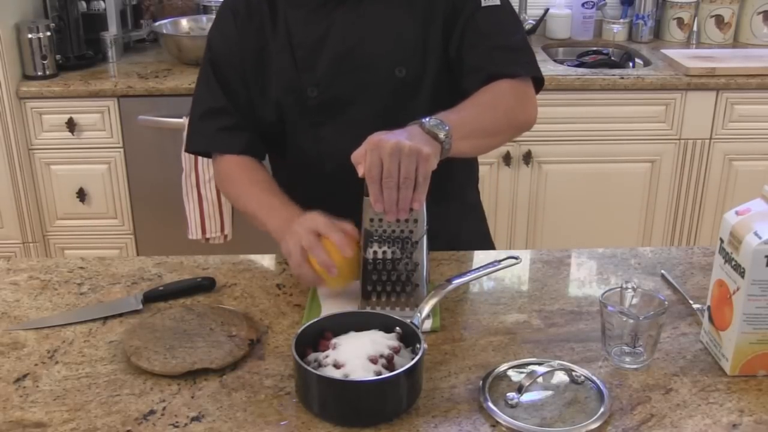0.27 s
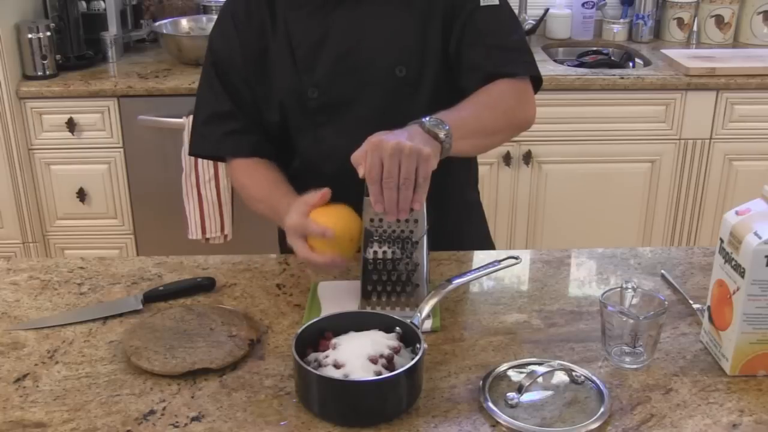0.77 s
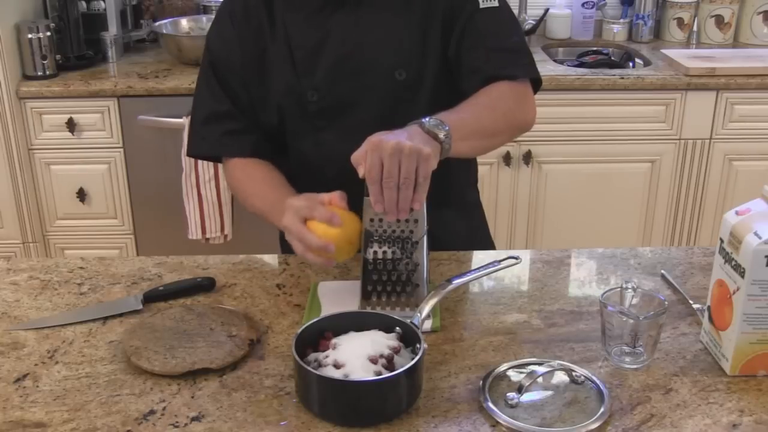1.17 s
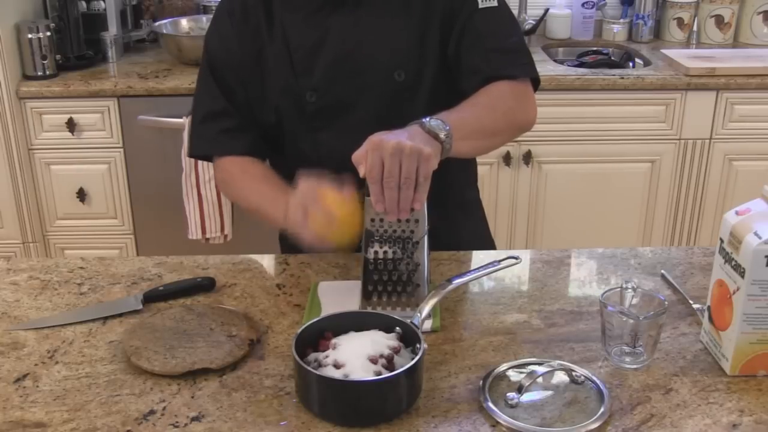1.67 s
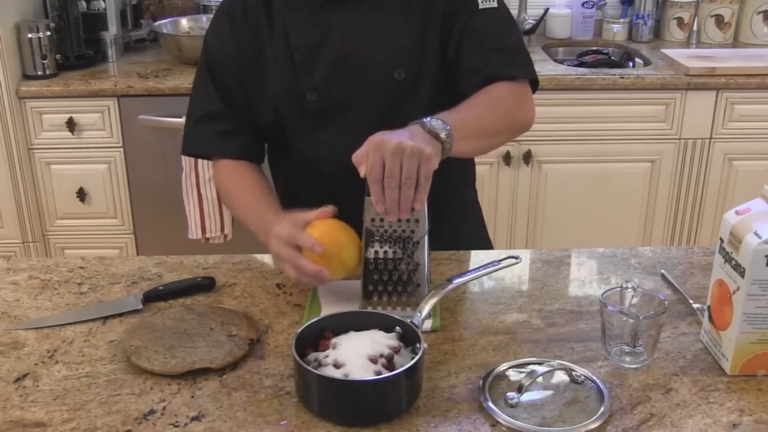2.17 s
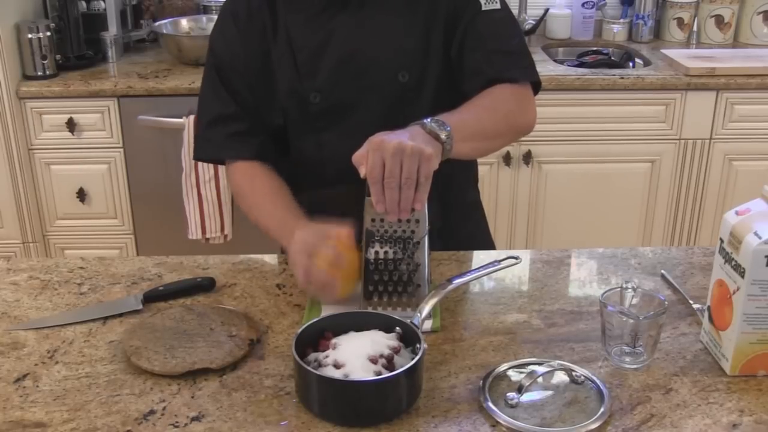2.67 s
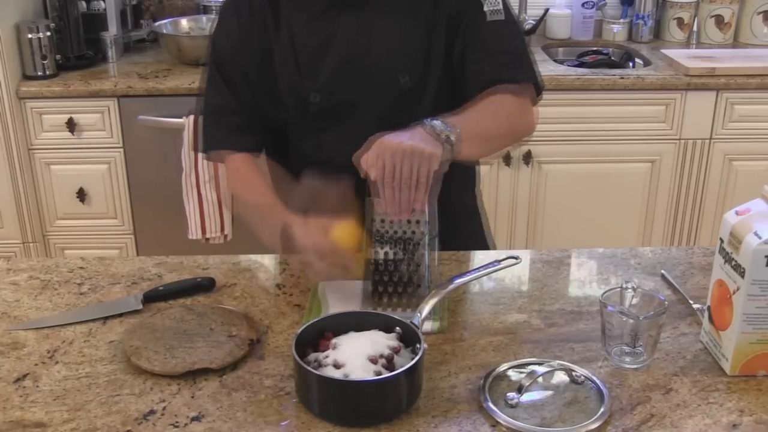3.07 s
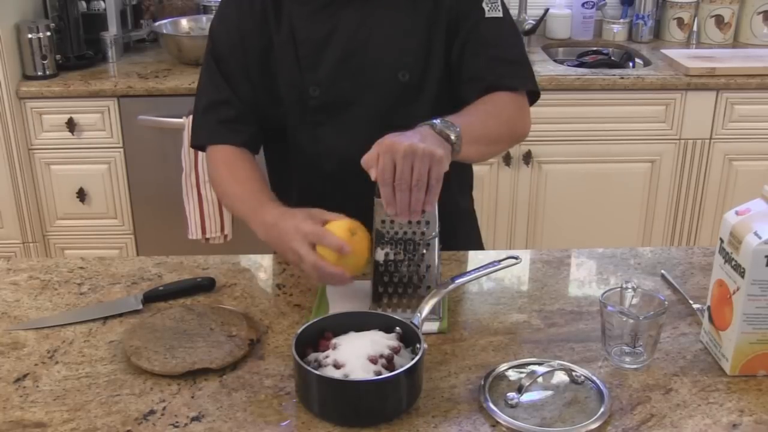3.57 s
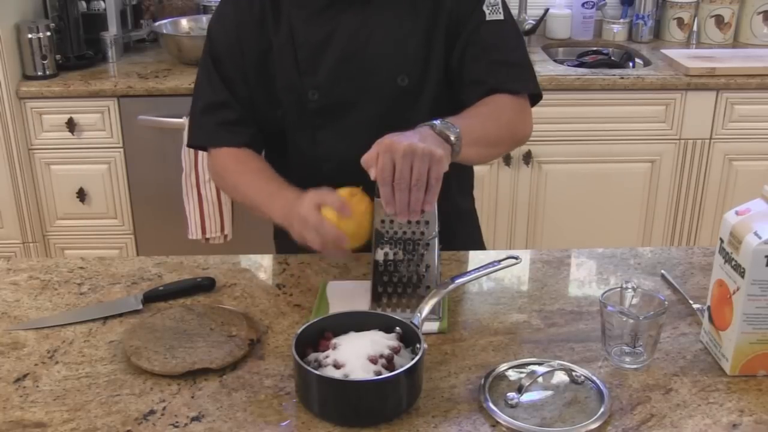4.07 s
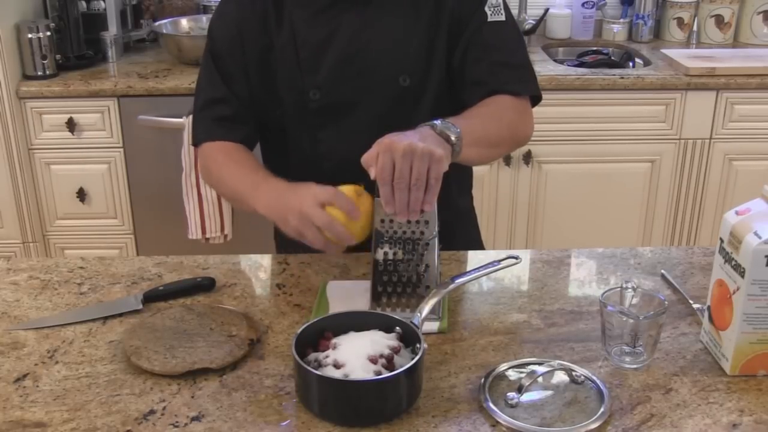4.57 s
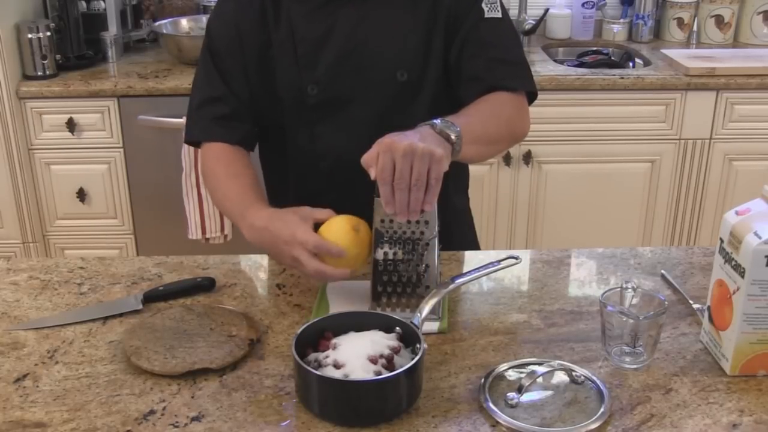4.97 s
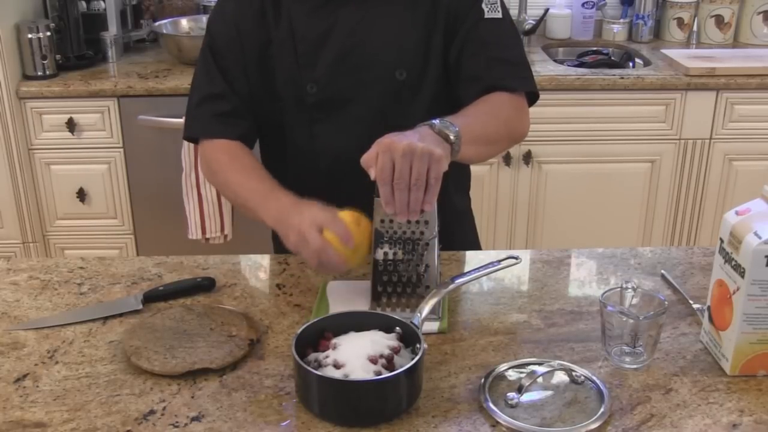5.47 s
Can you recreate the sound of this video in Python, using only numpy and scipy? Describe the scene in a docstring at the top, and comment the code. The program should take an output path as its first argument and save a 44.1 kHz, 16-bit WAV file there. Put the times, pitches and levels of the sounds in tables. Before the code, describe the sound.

In a reflective kitchen, an orange is zested on a hand-held steel box grater, heard from a moderate distance. A strong rasp is already under way at 0 s, with the heaviest low bump on the counter; a lighter stroke and a longer scrape follow until about 0.4 s. After a pause with a barely audible touch near 0.8 s, brisk strokes run from about 1.2 to 2.0 s, hard ones alternating with weak ones. Another gap leaves soft fan noise and faint hum. From about 2.7 to 3.4 s five rasps come close together. A small metallic touch at 3.8 s leads to a short catch and rapid alternating strokes from 4.0 to 4.9 s. Faint contacts near 5.4 s precede a new scrape at 5.5 s with a sharp tick. The rasps are dry, gritty and bright, with a damped tinny ring, tiny peel snaps, dull board thuds and deep stand rumble.

```python
"""Kitchen counter: an orange is zested on a steel box grater that stands on a board.
Each stroke is a burst of tiny peel snaps, heard straight from the teeth and through damped steel modes.
Noise shaped by the same strokes sounds the counter and shakes the microphone's stand; so do bumps of the foot.
Synthetic echoes and a decaying tail answer the grater; shaped fan noise and a faint hum lie underneath."""
import sys
import numpy as np
from scipy import signal
from scipy.fft import rfft, irfft, next_fast_len
from scipy.io import wavfile

SR = 44100
rng = np.random.default_rng(int(sys.argv[2]) if len(sys.argv) > 2 else 0)


def generate_wav(signal):
    """Clip the signal to [-1, 1] and save it as 16-bit WAV at the path in sys.argv[1]."""
    frames = np.transpose(np.atleast_2d(signal))
    scaled = np.clip(frames, -1, 1) * 32767
    pcm = np.round(scaled).astype(np.int16)
    wavfile.write(sys.argv[1], SR, pcm)


N = 252781
TIME = np.arange(N) / SR


def amp(db):
    """Decibels to gain."""
    return 10 ** (np.asarray(db) / 20)


def evened(x):
    """Scales to rms 1."""
    return x / np.sqrt(np.mean(x ** 2) + 1e-20)


def read(points, hz):
    """Reads a table on a log-frequency axis."""
    f, value = np.transpose(points)
    return np.interp(np.log(hz + 1), np.log(f + 1), value)


def add(mix, start_s, sound):
    """Mixes a sound in at a time, or at zero if that is negative."""
    part = mix[max(round(start_s * SR), 0):][:len(sound)]
    part += sound[:len(part)]


def through(x, response):
    """Plays a signal through an impulse response."""
    return signal.oaconvolve(x, response)[:N]


def colour(points, size=4096):
    """Causal, minimum-phase impulse response of energy 1 with the given spectrum."""
    hz = abs(np.fft.fftfreq(size, 1 / SR))
    log_gain = np.log(amp(np.maximum(read(points, hz), -100)))
    spectrum = np.exp(np.conj(signal.hilbert(log_gain)))
    response = np.fft.ifft(spectrum).real[:size // 2]
    return response / np.linalg.norm(response)


def ringing(modes, size=16384):
    """Impulse response of energy 1 of damped modes; a wider mode dies sooner."""
    t = TIME[:size]
    response = np.zeros(size)
    for hz, width_hz, db in modes:
        decay = np.exp(-np.pi * width_hz * t)
        response += amp(db) * width_hz * decay * np.sin(2 * np.pi * hz * t)
    return response / np.linalg.norm(response)


# fan noise spectrum: f/Hz, level/dB (density, relative)
FAN_SPECTRUM = [(20, -9.5), (40, -11), (60, -17), (85, -22), (150, -23), (400, -21), (950, -24),
                (1600, -26.5), (2300, -35), (4000, -39), (7000, -45.5), (11500, -50), (15800, -54)]
FAN_RMS_DB = -43.5


def fan(hum_hz=120, hum_db=-58):
    """Steady ventilation: shaped noise with a faint mains hum."""
    air = evened(through(rng.standard_normal(N), colour(FAN_SPECTRUM)))
    hum = np.sin(2 * np.pi * hum_hz * TIME)
    return amp(FAN_RMS_DB) * air + amp(hum_db) * hum


# reverberation of the kitchen: f/Hz, t60/s
TAIL_T60 = [(150, 0.59), (1000, 0.74), (3000, 0.71), (6000, 0.7), (9000, 0.59), (12000, 0.48),
            (16000, 0.69)]
# what the far walls give back: f/Hz, level/dB
WALL_RETURN = [(200, 6), (1000, 4.5), (2000, -3.5), (4000, -3), (7000, -6.5), (10000, -0.5), (16000, -7)]


def echoes(wet_db=-6.5, early_db=-7, size=30000):
    """Near surfaces throw back a few echoes; then a tail whose bands die at their own speeds."""
    hz, t, bands = signal.stft(rng.standard_normal(size), SR, nperseg=256)
    tail_db = read(WALL_RETURN, hz)[:, None] - 60 * t / read(TAIL_T60, hz)[:, None]
    tail = signal.istft(bands * amp(tail_db), SR)[1]
    early = np.zeros(len(tail))
    delays_s = rng.uniform(0.002, 0.025, size=12)
    early[(delays_s * SR).astype(int)] = rng.choice([-1, 1], size=12)
    return amp(wet_db) * tail / np.linalg.norm(tail) + amp(early_db) * early / np.linalg.norm(early)


def kitchen(x, count=11, spots_per_s=70):
    """The scraping spot travels over the grater, cycling through echo patterns, so they keep changing."""
    spot = TIME * spots_per_s
    out = x.copy()
    for k in range(count):
        nearness = np.maximum(1 - abs((spot - k) % count - 1), 0)  # each spot fades into the next
        out += through(x * np.sqrt(nearness), echoes())
    return out


# after its rise a stroke eases for this share of the time left, then lets go
HOLD_SHARE = 0.45


def bite(rise_s, hold_s, fall_s, ease=0.56, curve=0.99):
    """How hard the teeth bite in one stroke, 0-1: it swells, eases as the hand slows, and lets go."""
    knees_s = np.cumsum([0, rise_s, hold_s, fall_s])
    t = np.arange(0, knees_s[-1], 1 / SR)
    return np.interp(t, knees_s, [0, 1, ease, 0]) ** curve


def stroke_bite(start_s, rise_s, length_s):
    """The bite of a stroke of any length; one that starts before time zero is already under way."""
    hold_s = HOLD_SHARE * (length_s - rise_s)
    grip = bite(rise_s, hold_s, length_s - rise_s - hold_s)
    return grip[max(round(-start_s * SR), 0):]


# grating strokes, hard and light, with a few faint contacts and a short catch:
# t/s, rise/s, length/s, level/dB
GRATING_STROKES = [ (-0.05, 0.039, 0.11, -12), (0.069, 0.061, 0.12, -25.5), (0.211, 0.028, 0.22, -17),
                   (1.027, 0.046, 0.17, -45.5), (1.188, 0.061, 0.16, -19.5), (1.38, .04, 0.15, -35.5),
                   (1.511, 0.051, .15, -14.5), (1.684, 0.049, 0.12, -25.5), (1.799, .062, 0.17, -14),
                   (2.58, 0.051, 0.29, -46), (2.743, 0.061, .15, -15.5), (2.903, 0.057, 0.15, -25),
                   (3.041, 0.038, 0.12, -17.5), (3.176, 0.035, 0.12, -19), (3.321, 0.052, 0.085, -19.5),
                   (3.93, 0.028, 0.099, -38), (3.979, .018, .032, -21.5), (4.013, 0.031, .1, -15.5),
                   (4.137, 0.054, 0.15, -34), (4.27, 0.035, 0.11, -16), (4.406, 0.063, 0.11, -28.5),
                   (4.515, 0.045, 0.11, -15), (4.682, 0.032, 0.081, -28.5), (4.764, 0.071, .13, -17.5),
                   (5.385, 0.039, .065, -39.5), (5.445, 0.021, .055, -39.5), (5.524, 0.069, 0.11, -19.5),
                   (5.659, 0.043, 0.12, -30)]
PUSH_DB, PUSH_LAG_S = -15.5, 0.015  # relative to the stroke; builds a little after the teeth bite


def shoves():
    """The uneven push of all the strokes on the board: the harder the stroke, the harder the push."""
    push = np.zeros(N)
    for start_s, rise_s, length_s, db in GRATING_STROKES:
        grip = stroke_bite(start_s, rise_s, length_s)
        add(push, start_s + PUSH_LAG_S, amp(db + PUSH_DB) * grip)
    return push * rng.standard_normal(N)


# modes of the microphone's stand: f/Hz, t60/s, level/dB; t60 is that of the sway after a bump
STAND_MODES = [(13.935, 5.5, -0.5), (26.5, 0.59, 2.5)]
# the grater's foot bumps on the board: t/s, thud level/dB, stand shake level/dB
FOOT_BUMPS = [(0.035, -20, -16), (0.33, -29, -39), (1.315, -31.5, -45), (1.926, -26, -35),
              (2.875, -28, -20), (3.15, -29, -35), (4.038, -25.5, -26), (4.345, -28.5, -44),
              (4.831, -26.5, -35.5)]


def stand(push, tremble_db=-38, rattle_db=-3, width_hz=4, onset_s=0.019):
    """Bumps set the stand's low modes swaying; strokes shake the upper one, and the lower never quite rests."""
    slow, fast = (ringing([(hz, width_hz, 0)]) for hz, _, _ in STAND_MODES)
    out = amp(tremble_db) * through(rng.standard_normal(N), slow)
    out += amp(rattle_db) * through(push, fast)
    sway = np.zeros(N)
    for hz, t60_s, db in STAND_MODES:
        sway += amp(db - 60 * TIME / t60_s) * np.sin(2 * np.pi * hz * TIME)
    sway *= 1 - np.exp(-TIME / onset_s)
    for start_s, _, shake_db in FOOT_BUMPS:
        add(out, start_s, amp(shake_db) * sway)
    return out


# modes of board and counter: f/Hz, width/Hz, level/dB
COUNTER_MODES = [(49.3, 3.8, -4.5), (77, 7.5, 4), (141, 9.4, -24), (168.3, 17.5, -15.5)]


def counter(push, drone_db=-1, onset_s=0.015):
    """The push of each stroke, and each bump of the foot, sound the board and counter."""
    body = ringing(COUNTER_MODES)
    out = amp(drone_db) * through(push, body)
    thud = body * (1 - np.exp(-TIME[:len(body)] / onset_s))
    thud /= abs(thud).max()
    for start_s, thud_db, _ in FOOT_BUMPS:
        add(out, start_s, amp(thud_db) * thud)
    return out


def tearing(length, per_s=8000, spread_db=2.5):
    """Tiny snaps of uneven size as the teeth cut the peel."""
    size = amp(spread_db * np.minimum(rng.exponential(1, length), 3))
    sign = rng.choice([-1, 1], length)
    return evened(size * sign * (rng.random(length) < per_s / SR))


# the fruit is set against the steel: t/s, scuff level/dB, ring level/dB
FRUIT_TOUCHES = [(0.823, -45, -56), (3.818, -40.5, -36), (5.412, -50, -44)]


def touches(fade_s=0.048, ring_hz=1940, width_hz=60):
    """A soft landing scuffs the teeth and sounds the grater's main mode."""
    out, grip = np.zeros(N), bite(0.0023, 0.0027, fade_s)
    scuff, ring = colour(GRIT_SPECTRUM), ringing([(ring_hz, width_hz, 0)], size=2048)
    for start_s, scuff_db, ring_db in FRUIT_TOUCHES:
        body = amp(scuff_db) * scuff + amp(ring_db) * ring
        cuts = tearing(SR)[:len(grip)]
        add(out, start_s, signal.fftconvolve(grip * cuts, body))
    return out


# further sharp snaps of peel, mostly within strokes: t/s, peak level/dB
PEEL_SNAPS = [(1.187, -30), (2.409, -34), (3.074, -22), (3.995, -23), (5.554, -15)]
# strokes above HARD_DB catch with a snap; its peak is relative to the stroke
HARD_DB, CATCH_DB, CATCH_AFTER_S = -23, -7.5, 0.016


def snaps(decay_s=0.0032, low_hz=2200, top_hz=8000):
    """One tooth lets go with a short bright tick: early in each hard stroke that starts after time zero,
    and at a few other set times, mostly within strokes."""
    out, t = np.zeros(N), TIME[:512]
    band = signal.butter(2, [low_hz, top_hz], "band", fs=SR, output="sos")
    catches = [(start_s + CATCH_AFTER_S, db + CATCH_DB)
               for start_s, _, _, db in GRATING_STROKES if db > HARD_DB and start_s > 0]
    for start_s, peak_db in [*PEEL_SNAPS, *catches]:
        burst = rng.standard_normal(len(t)) * np.exp(-t / decay_s)
        tick = signal.sosfilt(band, burst)
        add(out, start_s, amp(peak_db) * tick / abs(tick).max())
    return out


def judder(rate_hz=60, depth_db=2.0):
    """The peel catches and slips on the rows of teeth, so the force flutters."""
    size = next_fast_len(N)
    hz = np.fft.rfftfreq(size, 1 / SR)
    shape = hz / rate_hz * np.exp(-hz / rate_hz)  # peaks at rate_hz
    flutter = evened(irfft(rfft(rng.standard_normal(size)) * shape, size))
    return evened(amp(depth_db * np.tanh(flutter[:N])))


# sound straight from the teeth: f/Hz, level/dB (density, relative)
GRIT_SPECTRUM = [(100, -12), (200, -68), (350, -20.5), (550, -10), (750, -7.5), (1100, -1), (2500, 3.5),
                 (3400, -1.5), (5000, -2.5), (6600, -4), (9000, -14), (10000, -17.5), (12000, -19.5),
                 (15800, -33)]
# modes of the hand-damped grater: f/Hz, width/Hz, level/dB
STEEL_MODES = [(1040, 26, -3.5), (1410, 28, 3.5), (1440, 50, -16), (1805, 24, -6), (1940, 87, 8),
               (2480, 120, -12), (2580, 89, -9), (3910, 116, 1), (4200, 120, -1.5), (5170, 80, -30),
               (5700, 130, -16), (5920, 90, -15), (8730, 380, -10.5)]
# tilt of a stroke at FULL_DB, and its change for each dB of stroke level
FULL_DB, FULL_TILT_DB_PER_OCTAVE, TILT_PER_DB = -15.5, 1.03, 0.0565


def rasp(ring_db=-9, grit_db=-2, wander_db=1.5):
    """Snaps are heard straight from the teeth and through the ringing steel; harder strokes are brighter."""
    catch, grit, out = judder(), colour(GRIT_SPECTRUM), np.zeros(N)
    cuts, plucks = catch * tearing(N), catch * tearing(N)
    # each stroke favours other modes of the plate
    spots = rng.standard_normal((len(GRATING_STROKES), len(STEEL_MODES)))
    for (start_s, rise_s, length_s, db), spot in zip(GRATING_STROKES, spots):
        first = max(round(start_s * SR), 0)
        grip = stroke_bite(start_s, rise_s, length_s)[:N - first]
        span = slice(first, first + len(grip))
        modes = np.array(STEEL_MODES) + np.outer(wander_db * spot, [0, 0, 1])
        steel = ringing(modes, size=len(grit))
        stroke = amp(grit_db) * signal.fftconvolve(grip * cuts[span], grit)
        stroke += amp(ring_db) * signal.fftconvolve(grip * plucks[span], steel)
        hz = np.fft.rfftfreq(len(stroke), 1 / SR)
        octaves = np.log2(np.maximum(hz, 500) / 3000)  # tilt pivots at 3 kHz, flat below 500 Hz
        tilt = FULL_TILT_DB_PER_OCTAVE + TILT_PER_DB * (db - FULL_DB)
        add(out, start_s, irfft(rfft(stroke) * amp(db + tilt * octaves), len(stroke)))
    return out


def scene():
    """The grater in the kitchen, over the low sounds of counter, stand and fan."""
    push = shoves()
    grater = rasp() + touches() + snaps()
    return (kitchen(grater) + counter(push) + stand(push) + fan())[None]


EDGE_HZ = 15800


def record(dry):
    """Linear-phase low-pass: limits the band to EDGE_HZ."""
    lowpass = signal.firwin(511, EDGE_HZ, window=("kaiser", 9), fs=SR)
    return signal.oaconvolve(dry, lowpass[None], "same")


dry = scene()
out = record(dry)
generate_wav(out)
```